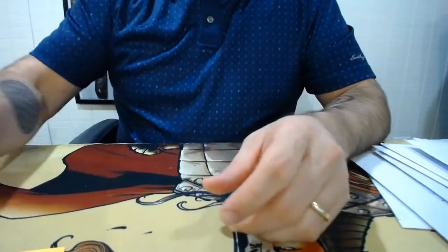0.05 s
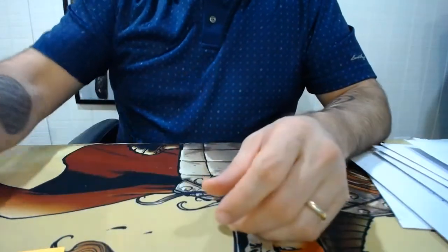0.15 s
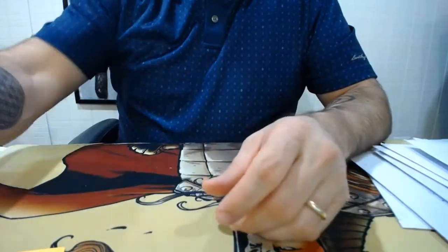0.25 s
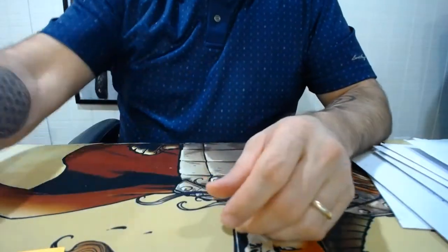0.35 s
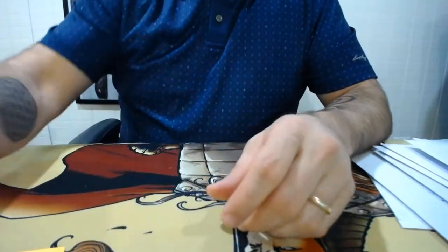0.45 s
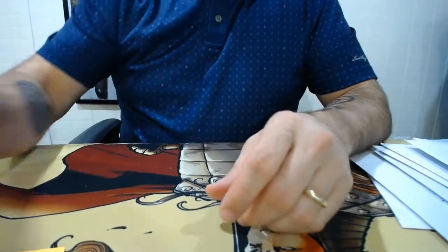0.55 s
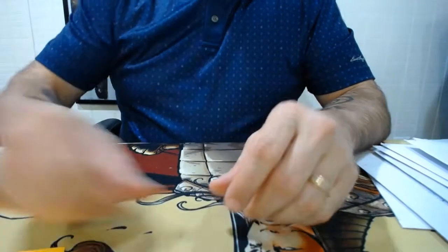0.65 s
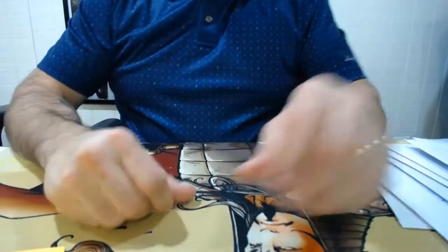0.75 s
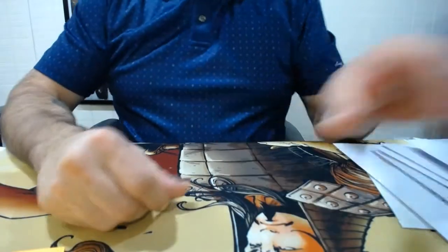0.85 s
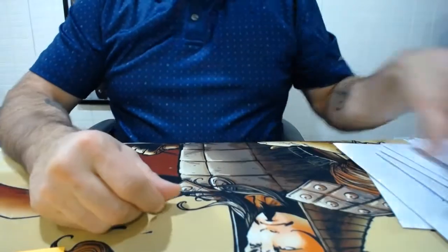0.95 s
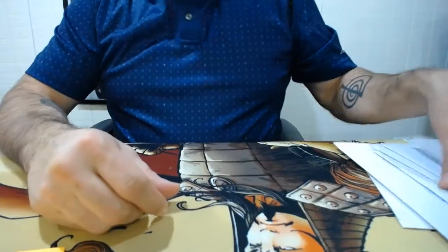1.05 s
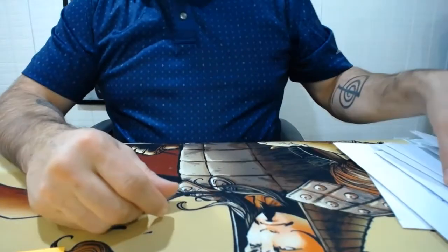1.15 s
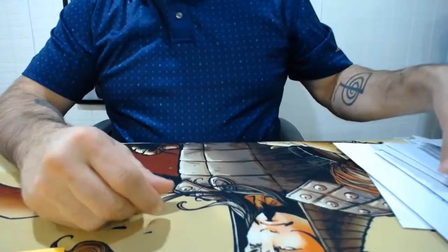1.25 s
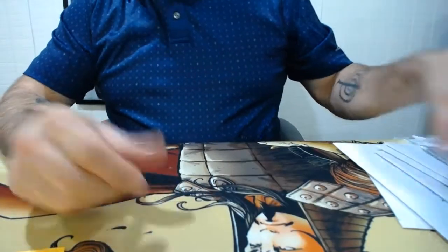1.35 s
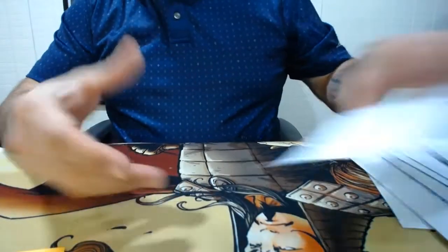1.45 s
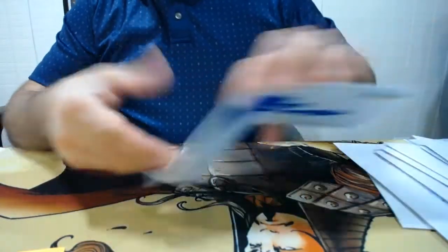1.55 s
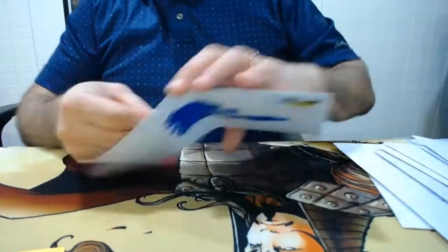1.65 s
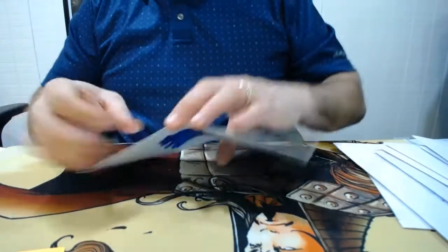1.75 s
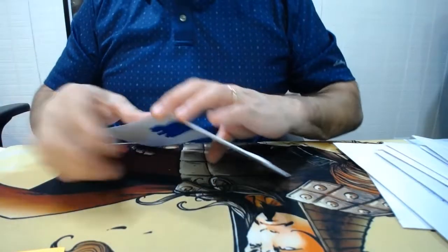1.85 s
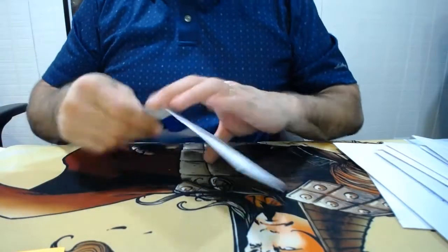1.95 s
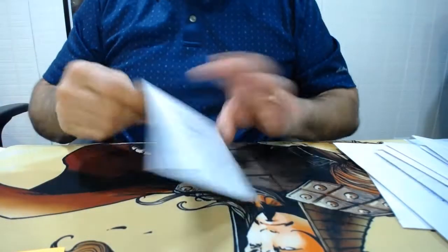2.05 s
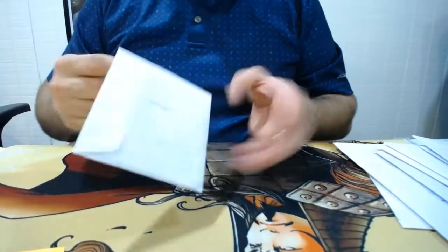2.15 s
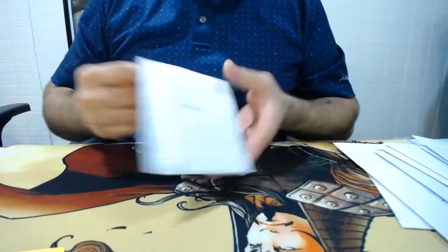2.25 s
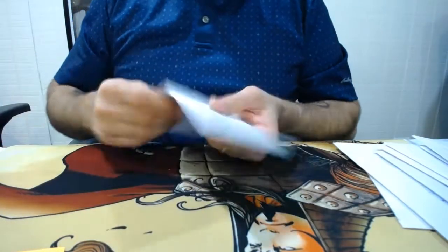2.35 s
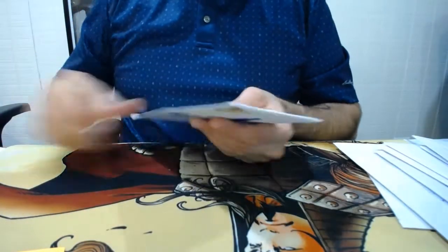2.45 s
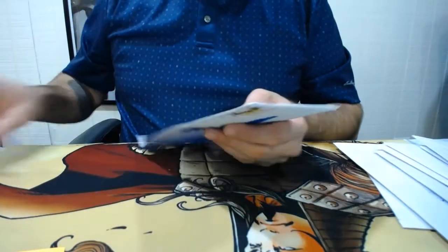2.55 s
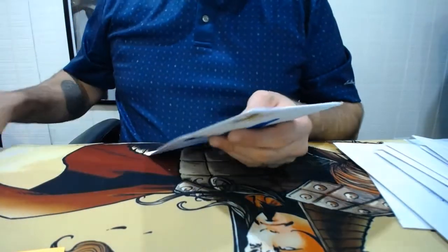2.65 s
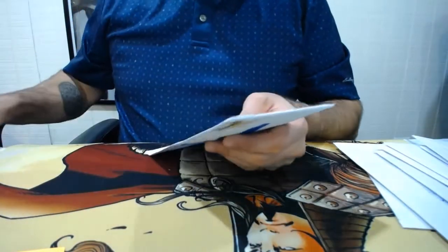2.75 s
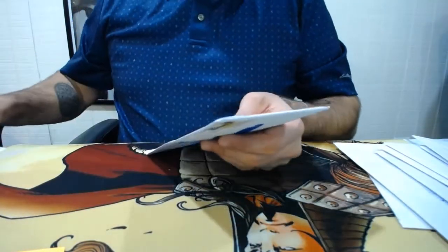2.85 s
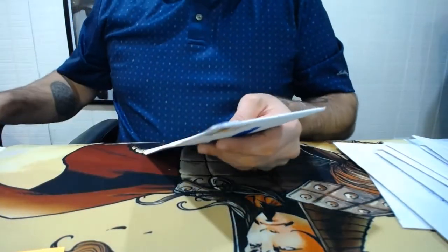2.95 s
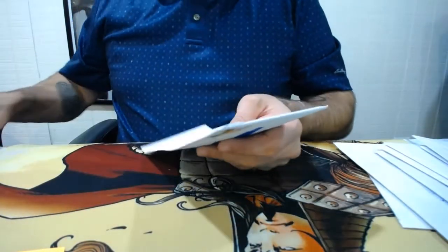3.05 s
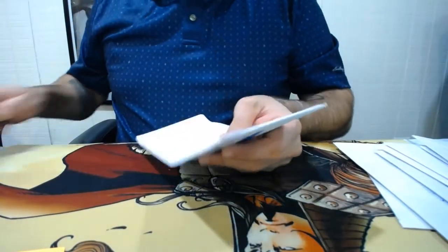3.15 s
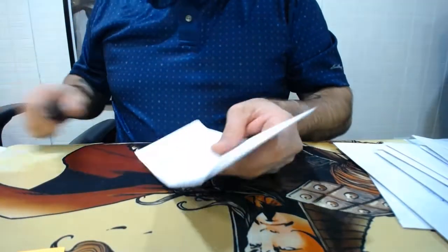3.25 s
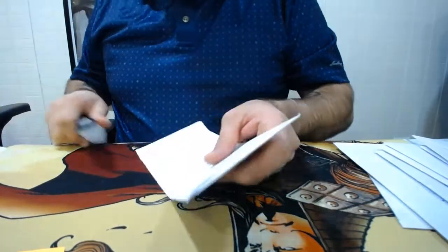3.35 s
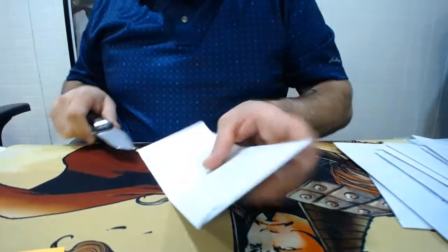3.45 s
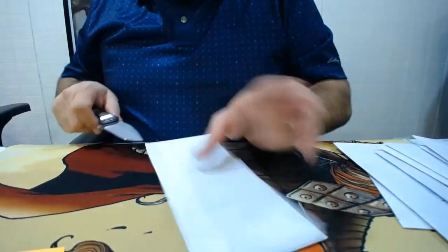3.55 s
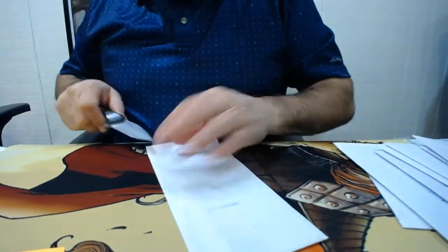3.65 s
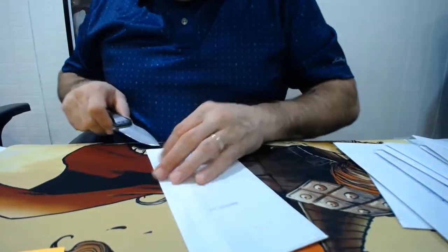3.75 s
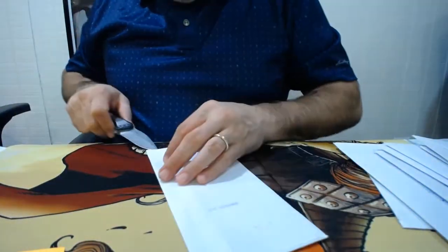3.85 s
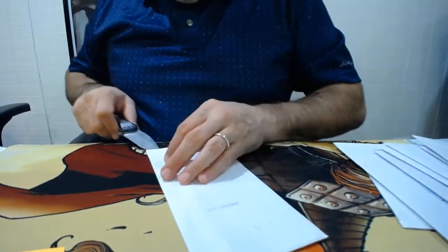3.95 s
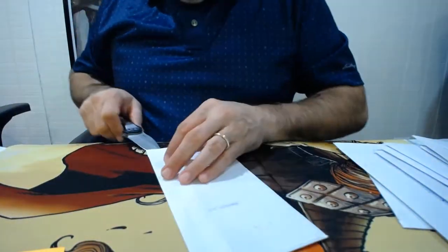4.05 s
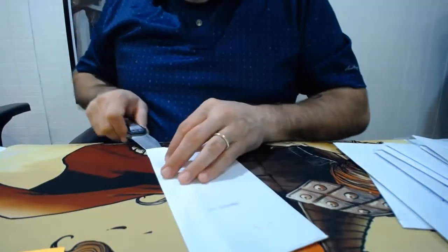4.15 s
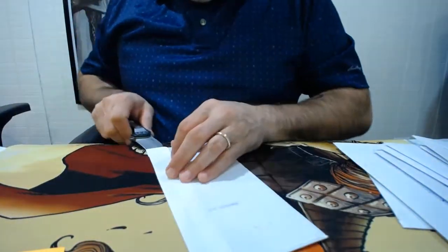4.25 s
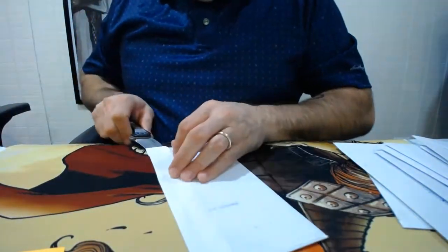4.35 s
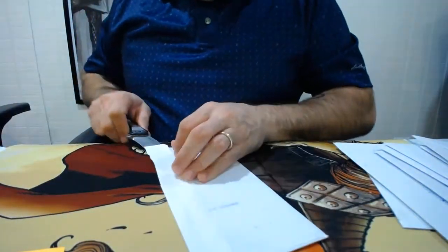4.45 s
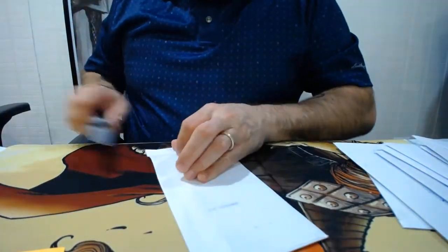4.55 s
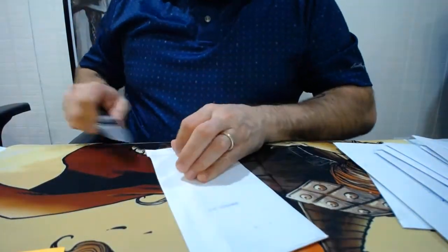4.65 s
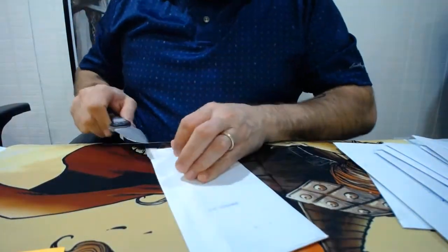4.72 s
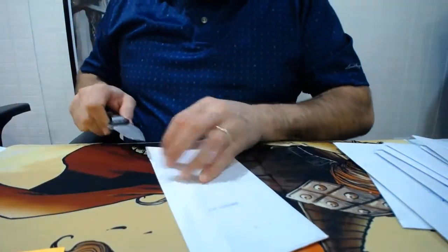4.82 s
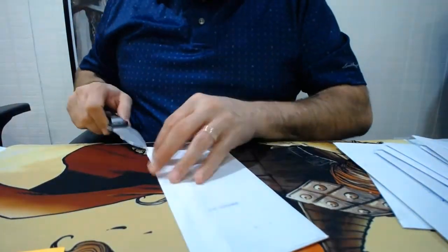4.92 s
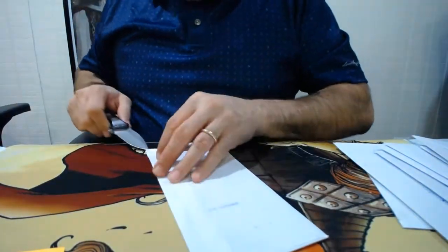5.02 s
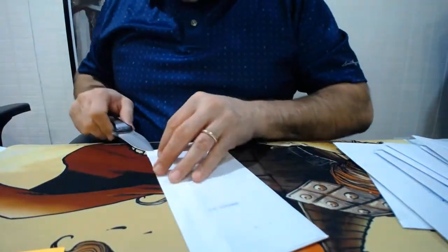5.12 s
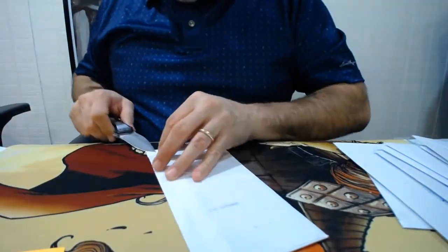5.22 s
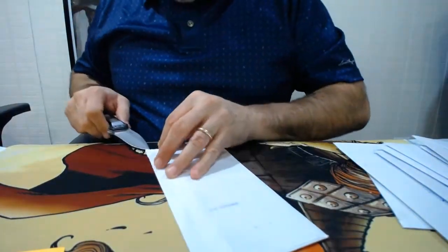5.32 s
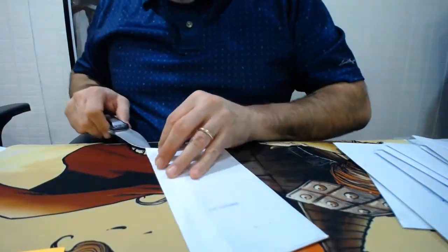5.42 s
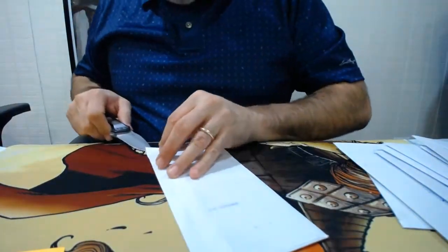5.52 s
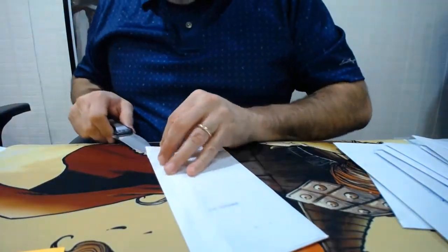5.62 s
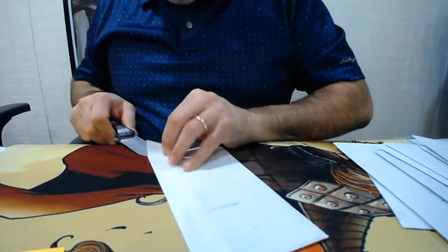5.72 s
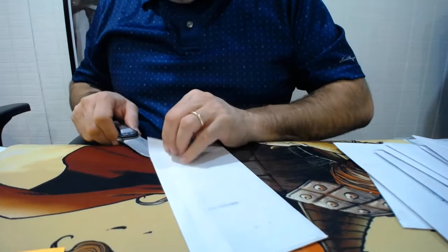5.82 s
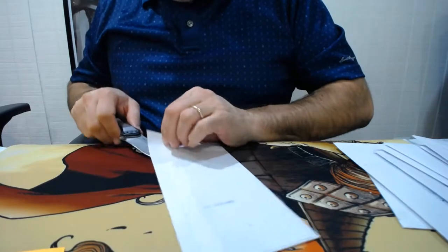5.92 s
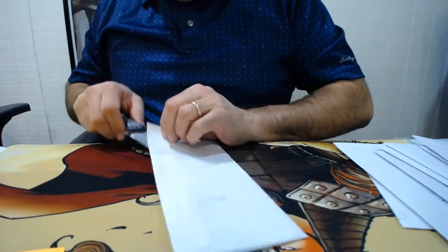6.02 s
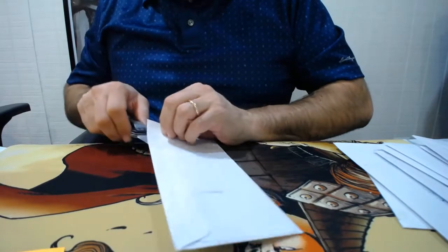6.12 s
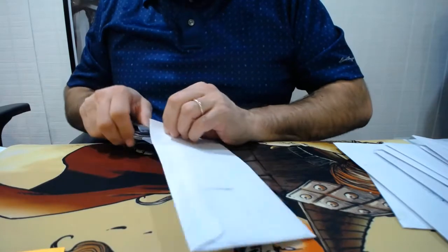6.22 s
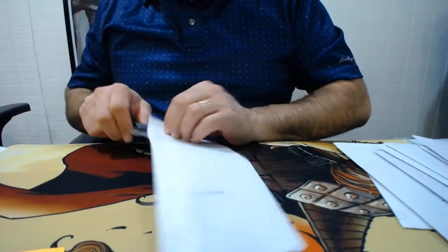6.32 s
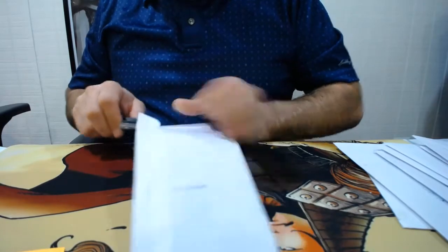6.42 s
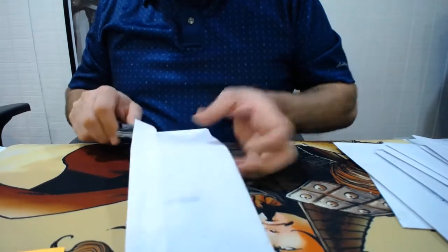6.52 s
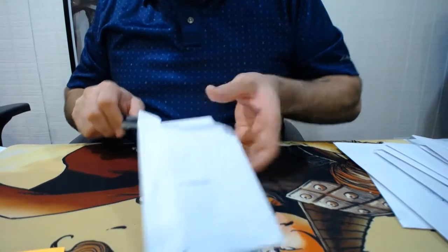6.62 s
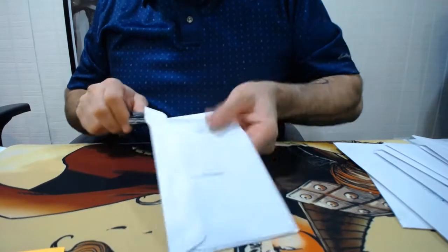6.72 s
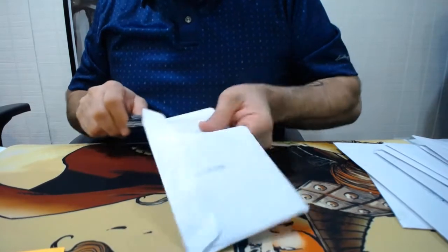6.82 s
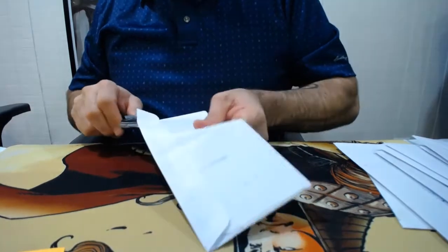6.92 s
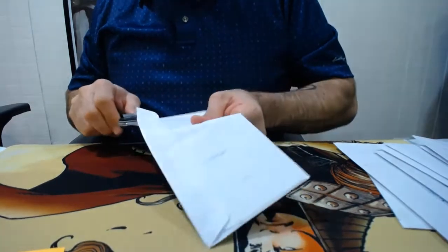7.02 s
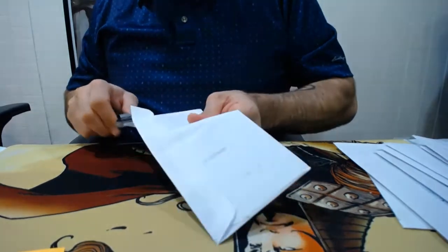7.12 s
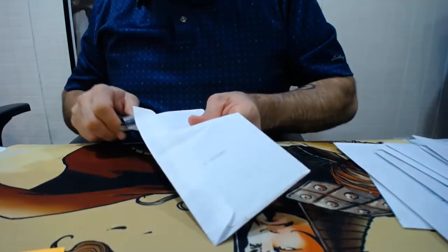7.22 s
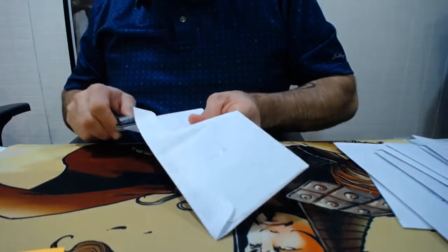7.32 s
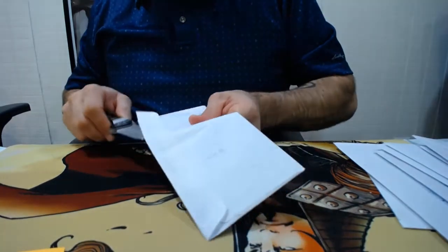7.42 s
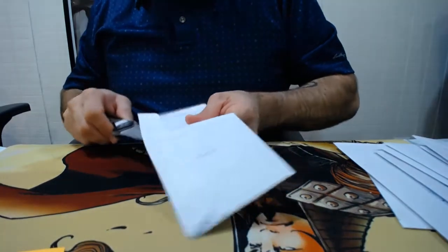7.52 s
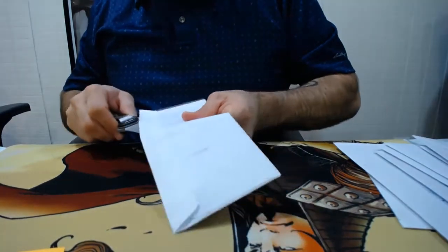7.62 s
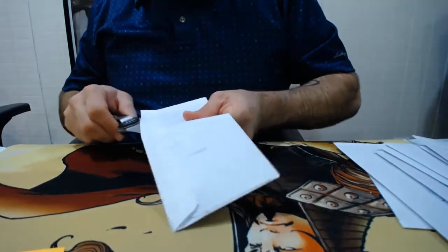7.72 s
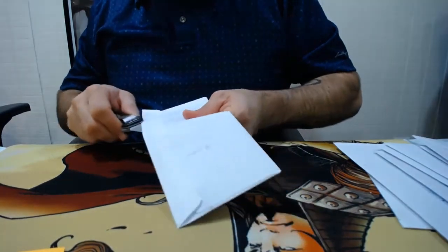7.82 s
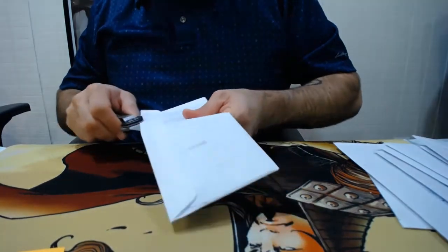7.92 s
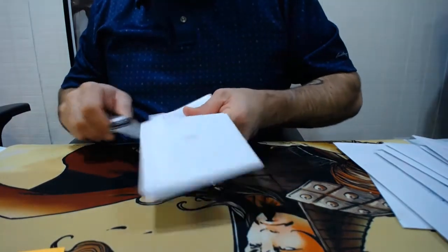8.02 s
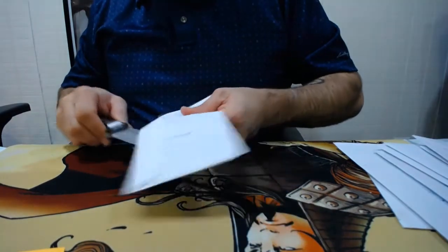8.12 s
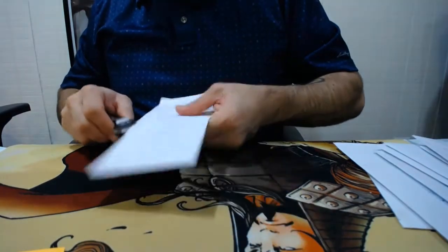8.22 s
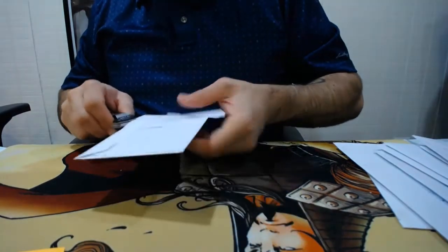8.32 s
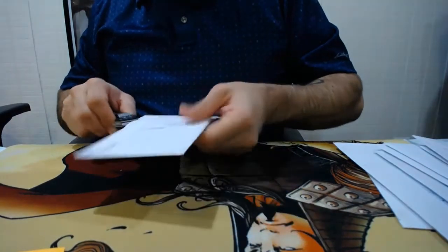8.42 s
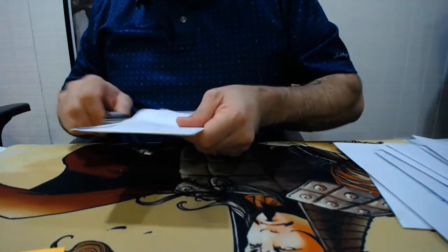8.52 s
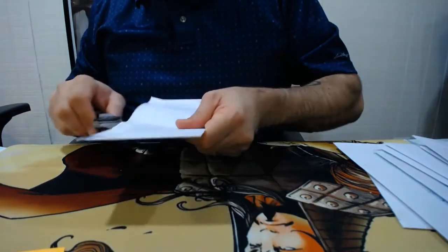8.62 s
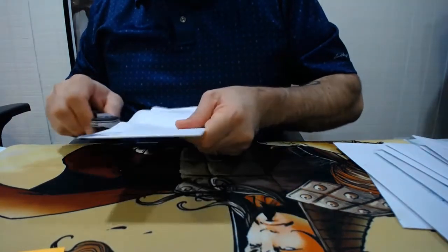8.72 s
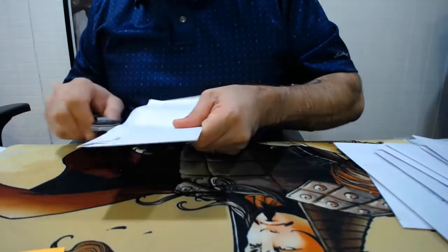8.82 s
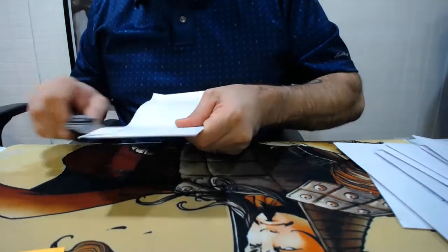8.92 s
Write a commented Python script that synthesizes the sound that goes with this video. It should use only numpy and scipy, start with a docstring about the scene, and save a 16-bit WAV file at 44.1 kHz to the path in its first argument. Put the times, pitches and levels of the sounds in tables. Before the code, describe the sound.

At a desk in a small room, an envelope is slid off a pile with quick swishes and a bump, then turned over. A light click follows, then faint scratches as a blade finds the gap. From about six seconds the paper crackles, pops and rips loudly in short bursts. Close stereo microphone, low electric hum and soft fan rush beneath.

```python
"""Paper slides and hisses as someone at a desk takes an envelope from a pile and slits it with a letter opener.
Slides are dense tiny slips and rips are runs of breaking fibres, both filtered by a bending sheet.
Creases snap as sharp pushes on a damped sheet, edges squeak as rough gliding tones, hands bump the desk.
A close stereo microphone hears it with the echoes of a small room, over a low electric hum and a fan's rush."""
import sys
import numpy as np
from scipy import signal
from scipy.fft import rfft, irfft, next_fast_len
from scipy.io import wavfile
from scipy.ndimage import uniform_filter1d

SR = 44100
rng = np.random.default_rng(int(sys.argv[2]) if len(sys.argv) > 2 else 0)


def unload_audio(sound):
    """Save the sound as a 16-bit wav file, at the path given as the first command line argument."""
    columns = np.transpose(np.atleast_2d(sound))
    # keep every value between -1 and 1, then stretch to whole-number steps
    steps = np.round(np.clip(columns, -1, 1) * 32767)
    wavfile.write(sys.argv[1], SR, steps.astype(np.int16))


N = 395577  # length of the scene in samples

# how far the blade holds the envelope open, so that its pocket resonates: (t/s, share/0-1)
POCKET_OPENING = [(6.6, 0.1), (7.0, 0.69), (7.2, 0.28), (7.5, 0.56), (7.75, 0.7), (8.05, 0.41), (8.3, 0.37)]
SPLIT_HZ = 2000  # the sheet as a whole radiates below this, the rubbed surface above it


def undb(db):
    """Turn decibels into gain."""
    return np.exp(np.asarray(db) * np.log(10) / 20)


def unit(x):
    """Scale a sound to rms 1."""
    return x / np.sqrt(np.mean(x ** 2))


def curve(rows):
    """Join (time, value) rows by straight lines, one value per sample."""
    s, value = np.transpose(rows)
    return np.interp(np.arange(N) / SR, s, value)


def bin_hz(size):
    """Frequencies of a transform's bins, raised by 1 Hz to keep clear of zero."""
    return np.arange(size // 2 + 1) * SR / size + 1


def spectrum_db(points, size):
    """Join (Hz, dB) points on a log frequency axis, at the bins of a transform."""
    hz, db = np.transpose(points)
    return np.interp(np.log(bin_hz(size)), np.log(hz), db)


def colour(x, points):
    """Filter a sound by a smooth spectrum."""
    size = next_fast_len(len(x), True)
    return irfft(rfft(x, size) * undb(spectrum_db(points, size)), size)[:len(x)]


def band(x, lo_hz, hi_hz, order=4):
    """Band-pass without phase shift, so that neighbouring bands join smoothly."""
    size = next_fast_len(len(x), True)
    hz = bin_hz(size)
    low_side = 1 / (1 + (lo_hz / hz) ** (2 * order))
    high_side = 1 / (1 + (hz / hi_hz) ** (2 * order))
    return irfft(rfft(x, size) * low_side * high_side, size)[:len(x)]


def walk(rate, size=N):
    """Wander smoothly at random with spread near 1; rate is new values per second."""
    step = max(int(SR / rate), 1)
    held = np.repeat(rng.standard_normal(size // step + 1), step)
    return unit(uniform_filter1d(held, step))[:size]


def add(track, s, sound):
    """Mix a sound into a track at a time in seconds."""
    i = max(int(s * SR), 0)
    track[i:i + len(sound)] += sound[:N - i]


def impulse(db, size):
    """Build the causal response that has a given spectrum, with its energy as early as possible."""
    cepstrum = irfft(np.log(undb(db)), size)
    cepstrum[1:size // 2] *= 2
    cepstrum[size // 2 + 1:] = 0
    return irfft(np.exp(rfft(cepstrum)), size)


def random_ticks(rate):
    """Single-sample ticks of either sign at random moments, rate per second on average."""
    return (rng.random(N) < rate / SR) * rng.choice([-1, 1], N)


def background():
    """Steady hum lines over the soft rush of a fan, growing slowly."""
    # hum of mains and a fan: (f/Hz, level/dB)
    hum_lines = [(30, -70), (120, -64.5), (150.5, -66.5), (170, -61.5), (210, -62), (240, -46.5),
                 (281, -65.5), (370, -67), (450, -64.5)]
    # spectrum of the fan's rush: (f/Hz, level/dB)
    air_colour = [(20, -33), (45, -23.5), (90, -18.5), (160, -16.5), (220, -7.5), (330, -16), (500, -23.5),
                  (900, -27.5), (2000, -35.5), (5000, -42), (10000, -47), (15000, -55)]
    # slow growth of the whole background: (t/s, level/dB)
    growth = [(0, -9), (1.3, -6.5), (3.2, -5.5), (5.2, -1.5), (7, -0.5), (8.97, 1.5)]
    t, hum = np.arange(N) / SR, np.zeros(N)
    for hz, db in hum_lines:
        hum += undb(db + .5 * walk(3.8)) * np.sin(2 * np.pi * (hz * t + rng.random()))
    air = unit(colour(rng.standard_normal(N), air_colour))
    side = unit(colour(rng.standard_normal(N), air_colour))
    mid = hum + undb(-58.0) * air
    # the side noise has opposite sign left and right, which widens the rush
    stereo = mid + undb(-63.5) * side * np.array([[1], [-1]])
    return stereo * undb(curve(growth))


def room(x, t60=0.092, tail_db=-15.5, desk_s=0.0013):
    """Near surfaces comb the middle range, a short tail follows; the treble differs between left and right."""
    # echoes from near surfaces: (delay/s, level/dB)
    near_echoes = [(.00582, -5.5), (.0128, -21)]
    t = np.arange(SR // 3) / SR
    dull, mid = colour(x, [(1500, -5.5), (3000, -16), (10000, -9)]), x.copy()
    for delay_s, db in near_echoes:
        add(mid, delay_s, undb(db) * dull)
    # the tail fades by 60 dB in t60 seconds and starts after 4 ms
    tail = rng.standard_normal(len(t)) * np.exp(-np.log(1000) * t / t60) * (t > .004)
    tail /= np.linalg.norm(tail)
    tail_source = colour(x, [(4000, 1.5), (12000, -6.5)])
    mid += undb(tail_db) * signal.fftconvolve(tail_source, tail)[:N]
    # a delayed copy, randomly varied in strength and sign, widens the treble between left and right
    bounce = np.roll(mid, int(desk_s * SR)) * walk(700)
    side = colour(bounce, [(1000, -21.0), (2000, -7), (4000, -4.5), (7500, 2.0), (11000, -2.5)])
    # below about 9 kHz the right channel comes one sample after the left
    right = mid - side
    late = band(right, 1, 9100, order=2)
    return np.array([mid + side, right - late + np.roll(late, 1)])


def bumps():
    """Hands and things bump the padded desk: a soft push rings it; longer contact sounds duller."""
    # bumps: (t/s, peak level/dB, contact time/s)
    bump_list = [(0.349, -34, .0004), (0.358, -52, .0008), (0.719, -46, .005), (1.522, -18, 0.00027),
                 (1.613, -27, .001), (1.723, -42, .0016), (1.899, -41, 0.0019), (2.316, -39, .0012),
                 (2.599, -33, .0036), (2.617, -41, 0.0029), (2.783, -33.5, .003), (2.793, -58, .0026),
                 (3.528, -27, .001), (4.433, -31.5, .001), (4.887, -47, .005), (6.452, -19, .0009),
                 (6.47, -27, .0026), (7.915, -35.5, .0018), (7.979, -42, .0014), (8.078, -42, .0005)]
    # ringing tones of the desk top: (f/Hz, time to fade by 60 dB/s, level/dB)
    desk_modes = [(55, 0.12, -12.5), (80, 0.31, -10), (120, 0.081, -2.5), (196, 0.043, -1.5),
                  (266, 0.075, 4), (414, 0.079, 4.5)]
    out, t = np.zeros(N), np.arange(SR // 4) / SR
    desk = np.zeros(len(t))
    for hz, t60, db in desk_modes:
        desk += undb(db) * np.exp(-np.log(1000) * t / t60) * np.cos(2 * np.pi * hz * t)
    for s, db, contact_s in bump_list:
        push = t * np.exp(-2 * t / contact_s)
        thud = signal.fftconvolve(push, desk)[:len(t)]
        add(out, s, undb(db) * thud / np.abs(thud).max())
    return out


def squeaks():
    """Stick-slip at a paper edge: a rough gliding tone."""
    # edges that sing or judder as they slide: (t/s, length/s, first f/Hz, last f/Hz, level/dB)
    squeak_list = [(0.333, 0.034, 653, 430, -41.5), (1.48, 0.061, 1715, 1397, -45),
                   (1.573, 0.066, 2350, 3235, -39), (1.699, 0.025, 2320, 1855, -50.5),
                   (1.899, 0.01, 1820, 1640, -32), (2.22, 0.016, 1400, 850, -55),
                   (2.359, 0.027, 1025, 1070, -59.5), (3.371, 0.045, 2700, 2040, -54),
                   (4.386, 0.022, 2700, 2580, -48.5), (4.447, 0.027, 2682, 2475, -31)]
    out = np.zeros(N)
    for s, length, first_hz, last_hz, db in squeak_list:
        size = int(length * SR)
        hz = np.linspace(first_hz, last_hz, size) * (1 + .09 * walk(1500, size))
        tone = np.sin(2 * np.pi * np.cumsum(hz) / SR)
        swell = np.hanning(size) * undb(3 * walk(400, size))
        add(out, s, undb(db) * unit(tone * swell))
    return out


def snaps(ring_db=14.0, ring_width=0.24, low_cut=0.32, scatter=0.092, scatter_s=0.001162, size=2048):
    """A buckle or tap: small slips around one sharp push ring the damped sheet, weak far below its ring."""
    # creases snapping, blade and paper edge tapping:
    # (t/s, rough peak level/dB, ring f/Hz, brightness/dB per octave)
    snap_list = [(.413, -37.5, 764, -7), (0.664, -40, 1520, -4), (1.039, -38, 6600, 15),
                 (1.522, -12, 694, -1), (1.613, -16.5, 530, -2.5), (1.649, -34, 797, -5),
                 (1.67, -31.5, 595, -9), (1.724, -27, 656, -2), (1.884, -18.5, 627, -5),
                 (1.902, -9.5, 1120, -7), (1.935, -27.5, 1010, -18), (2.025, -38.5, 950, 0.5),
                 (2.283, -25.5, 790, -14), (2.304, -31, 900, -3.5), (2.338, -35.5, 765, -5),
                 (3.177, -35.5, 1530, -3.5), (3.482, -46, 700, -13), (3.496, -34.5, 620, 1.5),
                 (3.527, -12, 1070, -2), (3.577, -48, 4300, 5), (3.647, -40, 977, -32),
                 (3.955, -31.5, 5470, 11.5), (4.074, -35.5, 5000, 13), (4.139, -21.5, 970, -2),
                 (4.231, -27, 795, -0.5), (4.355, -30, 980, -1), (4.375, -38, 2590, -8),
                 (5.296, -39.5, 3765, 7), (5.631, -20, 2500, 2.5), (5.648, -14.5, 780, 3.5),
                 (5.85, -28, 1240, -8.5), (5.895, -24.5, 1260, 4.5), (5.963, -32, 900, -11),
                 (6.111, -29, 5500, 4), (6.123, -20, 900, 4), (6.135, -31, 1290, -3),
                 (6.229, -27.5, 2000, 6.5), (6.241, -12, 2600, -1), (6.323, -16.5, 910, 3.5),
                 (6.45, -12, 1507, -13), (6.672, -32.5, 1080, -2), (6.706, -7, 1160, -3),
                 (6.916, 5.5, 3900, 1.5), (6.993, -26.5, 1000, 6), (7.109, -13, 1320, -2.5),
                 (7.233, -17, 1400, 0), (7.396, -2.5, 2330, 2), (7.432, -8, 1020, 3.5), (7.497, -7, 870, 1),
                 (7.535, -14, 3800, 14.5), (7.552, -6.5, 2350, -4), (7.654, -28.5, 1050, -3),
                 (7.758, -18, 1130, -2.5), (7.817, -21.5, 980, -4), (7.84, -10.5, 2560, -3.5),
                 (8.08, -17.5, 580, -3), (8.447, -18, 1970, 3), (8.453, -12, 980, -14)]
    # spectrum of a snap before its brightness and ring are added: (f/Hz, level/dB)
    snap_colour = [(80, -14.5), (460, -4.5), (1120, -1), (1900, -4), (3200, -4.5), (5500, -10), (7750, -21),
                   (11000, -31), (15000, -44.5)]
    crest_db = 23.5  # how far a snap's peak is taken to stand over its mean level
    out, t = np.zeros(N), np.arange(size) / SR
    hz = bin_hz(size)
    octaves = np.log2(np.clip(hz, 600, 9000))
    for s, db, ring_hz, bright_db in snap_list:
        low_loss = 10 * np.log10(1 + (low_cut * ring_hz / hz) ** 2)
        shape = spectrum_db(snap_colour, size) + bright_db * octaves - low_loss
        ring = ring_db / (1 + ((hz / ring_hz - 1) / ring_width) ** 2)
        push = scatter * rng.standard_normal(size) * t / scatter_s * np.exp(1 - t / scatter_s)
        push[int(scatter_s * SR)] += 1  # the one sharp push
        snap = signal.fftconvolve(push, impulse(shape + ring, size))[:size]
        add(out, s, unit(snap) * undb(db - crest_db))
    return out


def fibres(rate, spread_db, catch_rate, catch_db):
    """Tiny breaks of unequal size, stronger and weaker by turns as the paper catches and lets go."""
    return random_ticks(rate) * undb(spread_db * rng.standard_normal(N) + catch_db * walk(catch_rate))


def crinkle(rate, spread_db):
    """Now and then a tough fibre or a wrinkle gives way with a tick of its own."""
    return unit(random_ticks(rate) * undb(spread_db * rng.random(N)))


def flex(x, moves, depth_db, rate, focus_db, focus_octaves=0.76, taut_db=2.5, count=22):
    """A bending sheet: its resonances come and go band by band, around the pitch of each move."""
    usual_octave = np.log2(4370)  # a sheet held tauter than 4370 Hz hisses brighter, a slacker one duller
    hz, t, spectra = signal.stft(x, SR, nperseg=512)
    centres = np.linspace(np.log2(400), np.log2(14000), count)
    column = centres[:, None]
    steps = np.arange(int(t[-1] * rate) + 2)
    chance = rng.standard_normal((len(steps), count)).T
    wander = np.array([np.interp(t * rate, steps, row) for row in chance])
    # the pitch glides from the middle of one move to the middle of the next
    start, length, *_, pitch_hz = np.transpose(moves)
    middle = start + length / 2
    order = np.argsort(middle)
    pitch = np.log2(np.interp(t, middle[order], pitch_hz[order]))
    bright = taut_db * (pitch - usual_octave) * np.maximum(column - usual_octave, 0)
    focus = focus_db * np.exp(-((column - pitch) / focus_octaves) ** 2)
    gain = undb(depth_db * wander + bright + focus)
    # spread the band gains smoothly over the bins
    weights = np.array([np.interp(np.log2(hz + 1), centres, row) for row in np.eye(count)]).T
    gain = weights @ gain
    # bending moves energy between bands and adds none, for the sound's average spectrum
    gain /= np.sqrt(np.mean(np.abs(spectra) ** 2, axis=1) @ gain ** 2)
    return unit(signal.istft(spectra * gain, SR)[1][:N])


def strokes(moves, attack_s, release_s, arch_db):
    """Gains of surface and body: each move takes hold, arches and swells as the hand pushes, then lets go."""
    t, power = np.arange(N) / SR, np.zeros((2, N))
    for s, length, surface_db, body_db, swell_db, _ in moves:
        on = slice(int(s * SR), int((s + length + 10 * release_s) * SR))
        age = t[on] - s
        done = np.clip(age / length, 0, 1)
        push = undb(swell_db * (done - .5) + arch_db * (np.sin(np.pi * done) - 2 / np.pi))
        grip = np.clip(age / attack_s, 0, 1) * np.exp(-np.maximum(age - length, 0) / release_s)
        power[:, on] += (undb([[surface_db], [body_db]]) * push * grip) ** 2
    return np.sqrt(power)


def ripping(pocket_db=-2.0, crinkle_db=-12.5):
    """The edge breaks fibres in a dense run; the taut envelope and its open pocket radiate their low part."""
    # quick scrapes and rips, pitch being the sheet's loudest resonance:
    # (t/s, length/s, crackle level/dB, sheet body level/dB, swell from start to end/dB, pitch f/Hz)
    rip_moves = [(0.325, 0.03, -42.5, -39, 9.5, 2500), (1.512, 0.033, -39, -44.5, 1, 5370),
                 (1.592, 0.023, -56, -59, -3, 3000), (4.419, 0.035, -23, -29, 8.5, 2944),
                 (7.242, 0.021, -30, -31, 15, 4600), (7.265, 0.056, -36, -29.5, -1, 4600),
                 (7.306, 0.044, -31, -23.5, -6, 5400), (7.595, 0.014, -29, -30, 10.5, 4175),
                 (7.899, 0.055, -22.5, -23.5, -2, 4290), (7.943, .053, -17, -16, 7, 4200),
                 (7.991, 0.036, -27.5, -20.5, 2.5, 4500), (8.439, .068, -31.5, -39.5, 17, 5510),
                 (8.515, 0.032, -38.5, -45.5, 0, 6000), (8.561, 0.037, -33, -39.5, -6, 5720),
                 (8.599, .027, -30, -39.5, -2.5, 5600), (8.778, 0.06, -25, -29, 5.5, 5610),
                 (8.824, 0.076, -22, -33.5, -0.5, 5630)]
    # spectrum of the breaking fibres before the sheet bends: (f/Hz, level/dB)
    rip_colour = [(100, -32.5), (250, -26.5), (450, -16), (700, -8.5), (1000, -1.5), (1220, -9.5),
                  (1500, -8), (2000, -9), (2600, -4.5), (3500, -3.5), (4800, -3.5), (7500, -8),
                  (10200, -10), (15500, -34)]
    crackle_gain, body_gain = strokes(rip_moves, attack_s=.0062, release_s=.0049, arch_db=3.0)
    opening = np.clip(curve(POCKET_OPENING), 0, 1)
    breaks = unit(fibres(rate=9500, spread_db=3.0, catch_rate=270, catch_db=1.47))
    breaks += undb(crinkle_db) * crinkle(rate=350, spread_db=12)
    breaks = flex(colour(breaks, rip_colour), rip_moves, depth_db=4.5, rate=65, focus_db=2.0, count=60)
    crackle = unit(band(breaks, SPLIT_HZ, 20000))
    body = unit(band(breaks, 80, SPLIT_HZ))
    # the crossed limits leave only a narrow peak near 1250 Hz
    pocket = unit(band(breaks, 1300, 1200, order=10))
    low_part = np.sqrt(1 - opening) * body + undb(pocket_db) * opening * pocket
    return crackle * crackle_gain + low_part * body_gain


def sliding(crinkle_db=-9.5):
    """Dense slips hiss at the surface, drum on the sheet and ring the open pocket."""
    # paper sliding on paper, skin and blade; pitch is the sheet's loudest resonance, higher where held taut.
    # An envelope is drawn off the pile (from 0.2 s), turned over and laid down (2 s); the blade feels for
    # the gap (3.7 s), slides in and lifts the flap (5.9 s), rubs along the fold and comes out (from 7.4 s):
    # (t/s, length/s, hiss level/dB, sheet body level/dB, swell from start to end/dB, pitch f/Hz)
    slide_moves = [ (0.236, 0.023, -75, -79, 21, 6000), (0.669, 0.202, -71.5, -72.5, -3, 4530),
                   (1.0, 0.13, -67, -66.5, -11, 5700), (1.132, 0.17, -68, -71, 7, 6760),
                   (1.485, .129, -44, -57, -3, 5000), (1.617, 0.24, -57, -60.5, -14, 4920),
                   (1.688, 0.017, -46.5, -50, -4, 3870), (1.749, .03, -51, -59, -5, 4470),
                   (1.869, 0.14, -57, -57.5, -10, 5300), (2.02, 0.22, -73.5, -70.5, -8, 5320),
                   (2.22, 0.096, -57, -61, 1.5, 7320), (2.312, .5, -74.5, -80, -4, 5000),
                   (2.876, 0.82, -72, -75.5, 6, 4600), (3.368, .03, -53.5, -59, 0, 3000),
                   (3.401, .03, -52.5, -61, 1, 6000), (3.664, 0.0073, -57, -58, 12.5, 4000),
                   (3.713, .37, -78, -79, 12, 4400), (4.072, 0.1435, -55.5, -64, 8, 4680),
                   (4.362, .06, -55.5, -54, 14, 4400), (4.459, 0.041, -62.5, -57.5, -14, 4400),
                   (4.686, 0.12, -69, -72, -3, 5000), (4.875, 0.016, -61, -61.5, -4, 4610),
                   (5, 0.18, -77, -83.5, 11, 3700), (5.533, 0.35, -66.5, -74.5, -1, 6000),
                   (5.63, .035, -43, -52, -7, 4505), (5.853, 0.2316, -46, -57.5, 8, 4310),
                   (6.112, .025, -48, -46.5, 2, 4960), (6.227, .078, -51.5, -50.5, -3, 3800),
                   (6.297, 0.019, -47, -39.5, 3, 3200), (6.35, 0.034, -52.5, -56.5, 7, 6600),
                   (6.439, 0.0056, -54, -43, -5, 3000), (6.506, .16, -56.5, -71, 7, 5520),
                   (6.688, .31, -58.5, -54.5, 6, 4000), (6.774, 0.013, -46.5, -48.5, -3, 5800),
                   (6.839, 0.025, -43.5, -40, -25, 6020), (6.983, 0.21, -59, -47.5, -1.5, 4510),
                   (7.388, 0.169, -40.5, -34.5, 8.5, 3900), (7.568, 0.15, -54, -48, -12, 3785),
                   (7.691, .18, -53, -43, -7, 3480), (8.038, .135, -48.5, -49, -2.5, 7500),
                   (8.164, .21, -76.5, -73.5, 3, 5980), (8.375, 0.061, -56.5, -59, 16.5, 6000),
                   (8.665, 0.11, -59, -77, -13, 5940), (8.917, 0.02, -45.5, -52, 17, 5150)]
    # spectrum of the slips before the sheet bends: (f/Hz, level/dB)
    slide_colour = [(290, -50.5), (500, -9.5), (781, -10.5), (876, -10), (1090, -13.5), (1620, -8.5),
                    (1750, -9.5), (2800, -4), (3380, -5.5), (5920, -5.5), (8480, -9.5), (13400, -20),
                    (15500, -42.5)]
    hiss_gain, body_gain = strokes(slide_moves, attack_s=.008, release_s=.014, arch_db=0.5)
    opening = np.clip(curve(POCKET_OPENING), 0, 1)
    slips = unit(fibres(rate=9400, spread_db=1.5, catch_rate=65, catch_db=1.5))
    slips += undb(crinkle_db) * crinkle(rate=87, spread_db=14.5)
    slips = flex(colour(slips, slide_colour), slide_moves, depth_db=5.0, rate=16, focus_db=5.5, count=36)
    hiss = unit(band(slips, SPLIT_HZ, 15000))
    sheet = unit(band(slips, 440, SPLIT_HZ))
    pocket = unit(band(slips, 990, 1210, order=10))
    low_part = (1 - opening) * sheet + opening * pocket
    return hiss * hiss_gain + low_part * body_gain


def scene():
    """All handling sounds in the room, a little louder on the right, over the background."""
    handling = room(sliding() + ripping() + squeaks() + snaps() + bumps())
    return handling * undb([[-.8], [0.4]]) + background() * undb([[-1.3], [1.2]])


def record(dry):
    """The microphone clips at full scale and cuts the top."""
    top_hz = 15700
    low_pass = signal.ellip(8, .2, 70, top_hz, fs=SR, output="sos")
    return signal.sosfilt(low_pass, np.clip(dry, -1, 1))


dry = scene()
out = record(dry)
unload_audio(out)
```